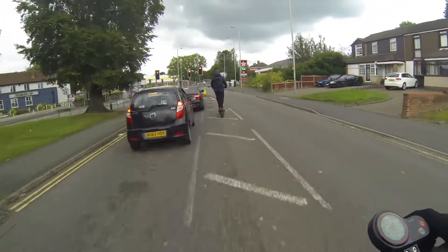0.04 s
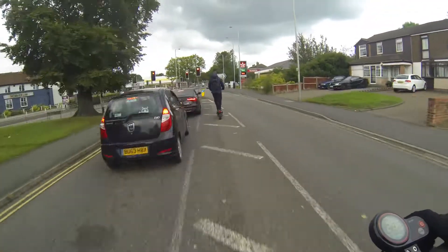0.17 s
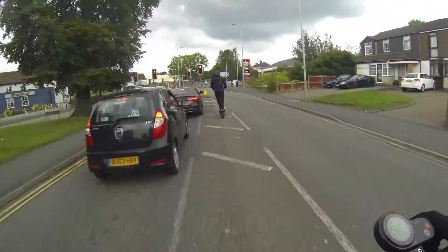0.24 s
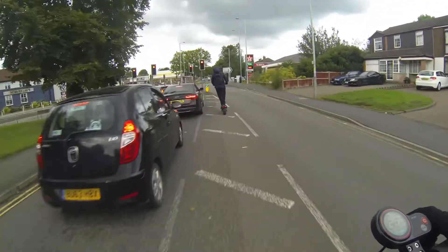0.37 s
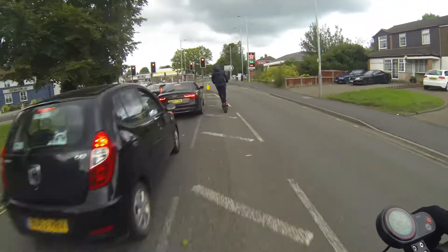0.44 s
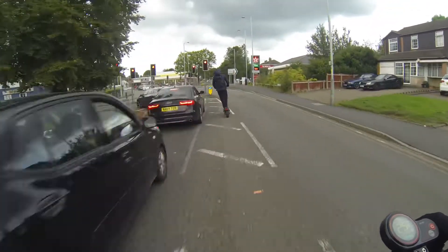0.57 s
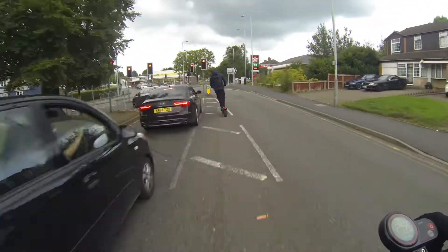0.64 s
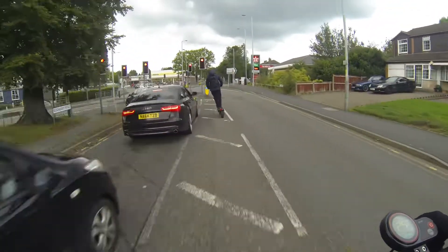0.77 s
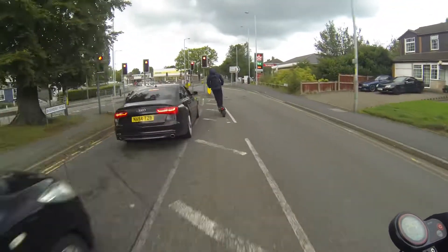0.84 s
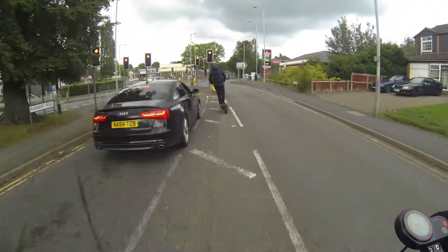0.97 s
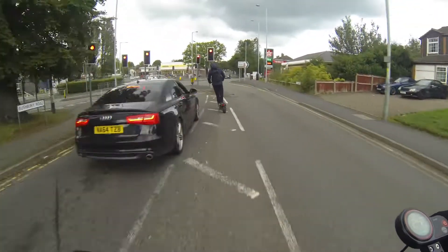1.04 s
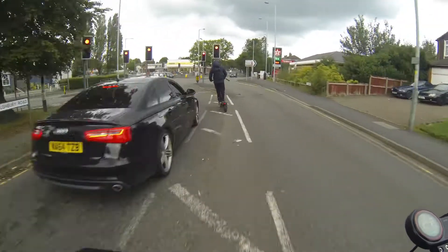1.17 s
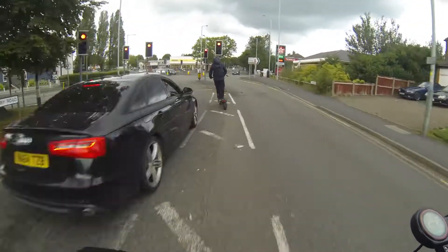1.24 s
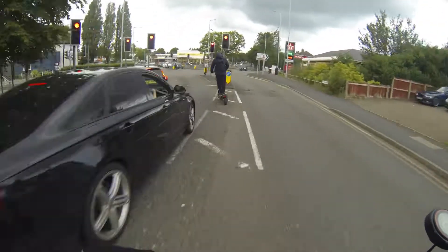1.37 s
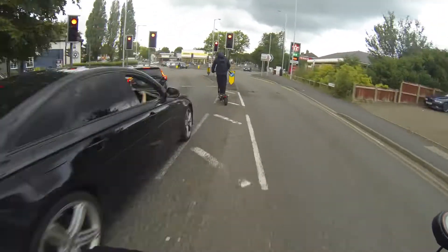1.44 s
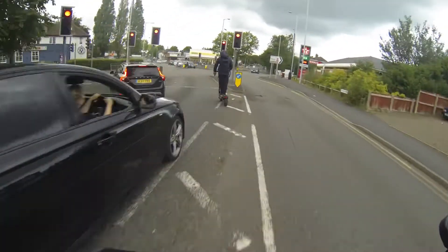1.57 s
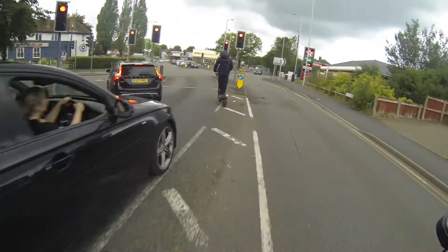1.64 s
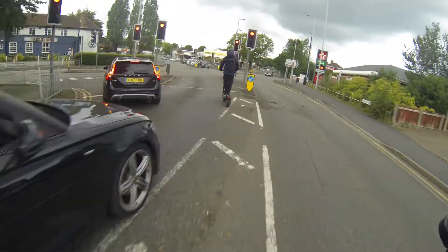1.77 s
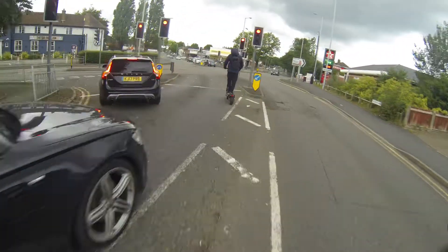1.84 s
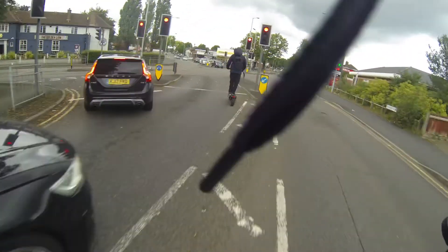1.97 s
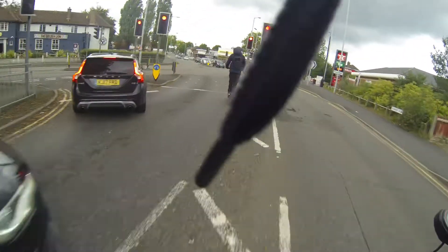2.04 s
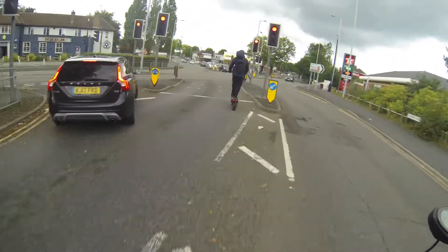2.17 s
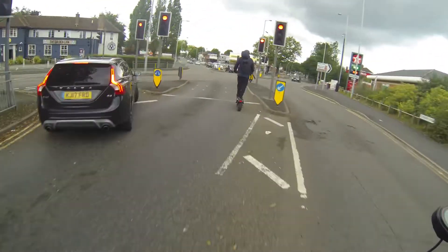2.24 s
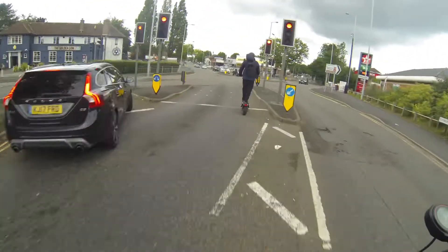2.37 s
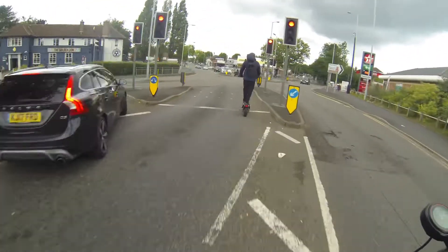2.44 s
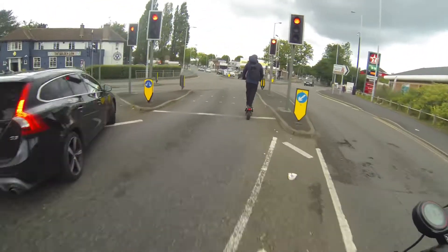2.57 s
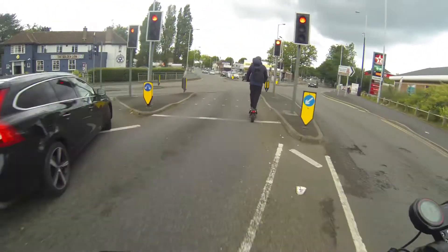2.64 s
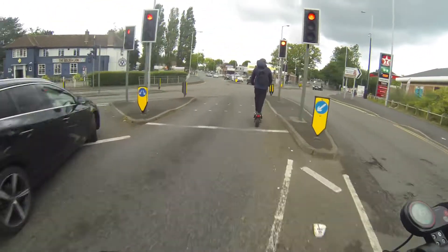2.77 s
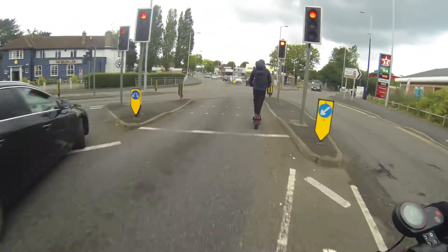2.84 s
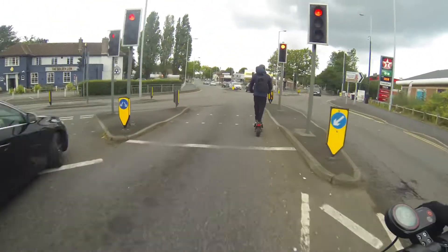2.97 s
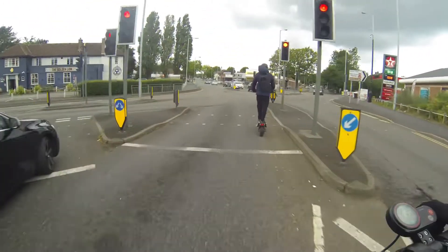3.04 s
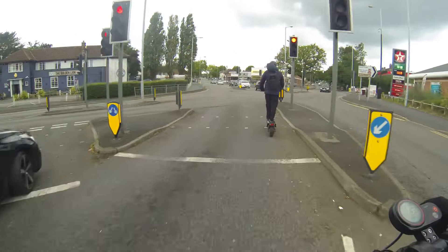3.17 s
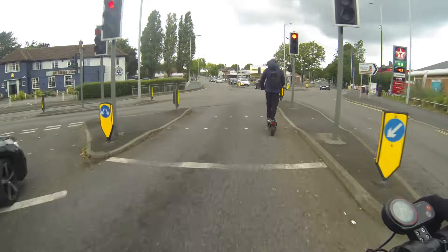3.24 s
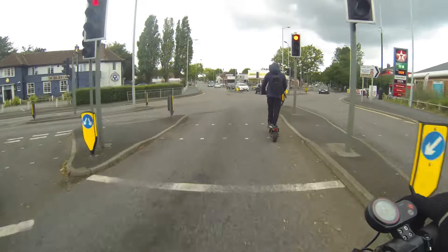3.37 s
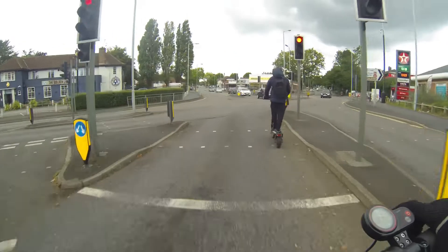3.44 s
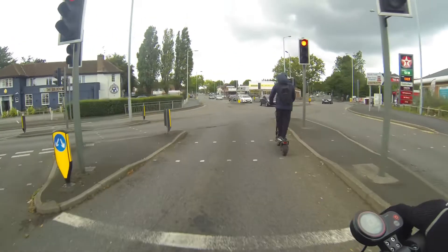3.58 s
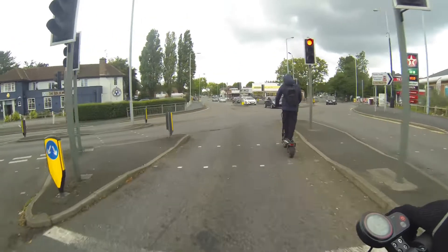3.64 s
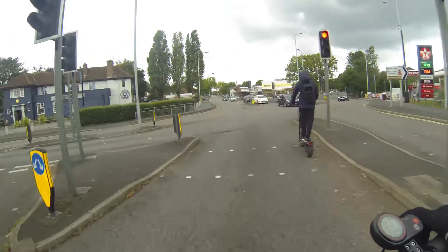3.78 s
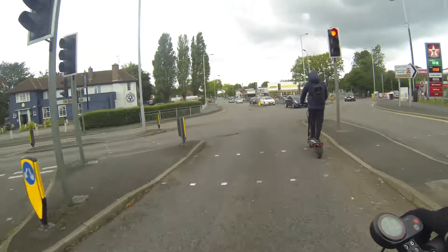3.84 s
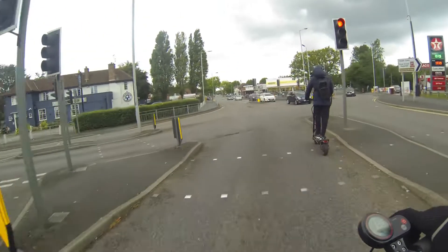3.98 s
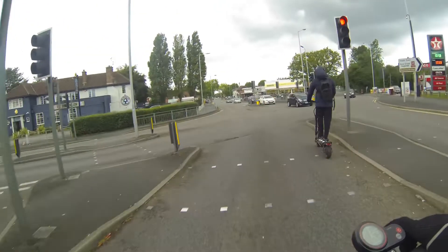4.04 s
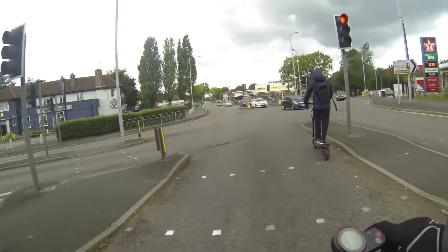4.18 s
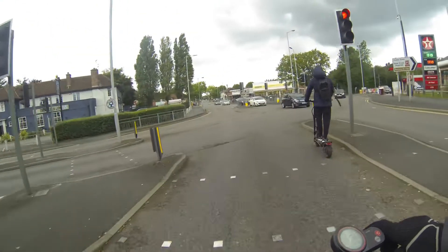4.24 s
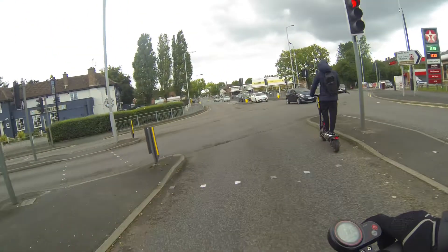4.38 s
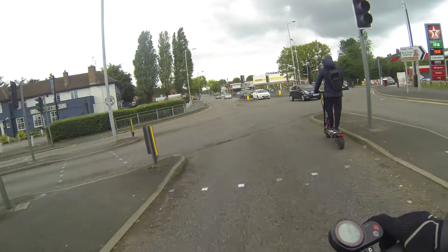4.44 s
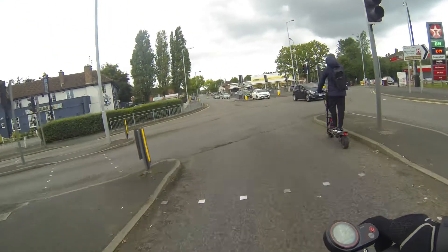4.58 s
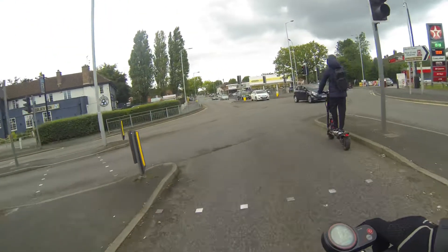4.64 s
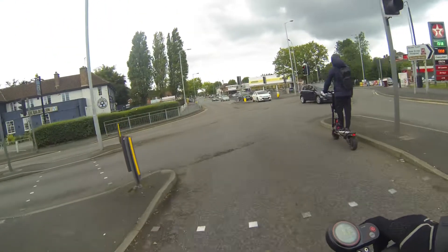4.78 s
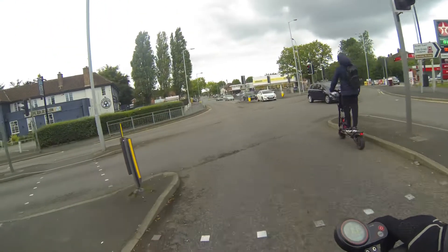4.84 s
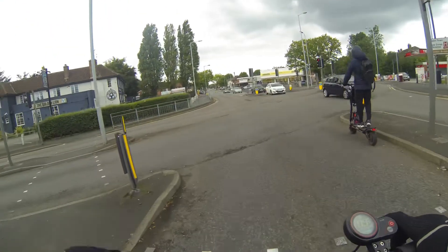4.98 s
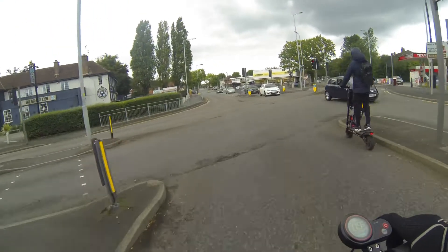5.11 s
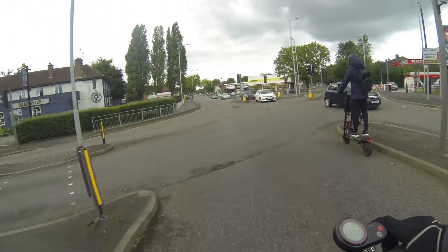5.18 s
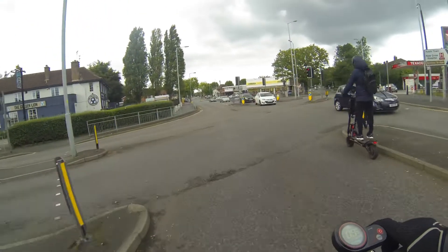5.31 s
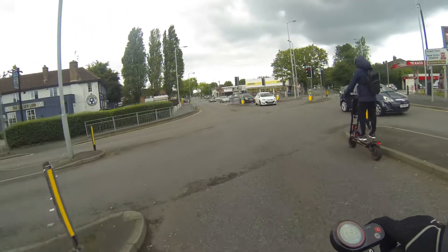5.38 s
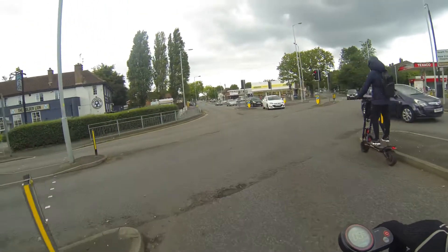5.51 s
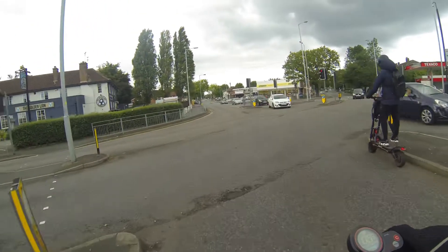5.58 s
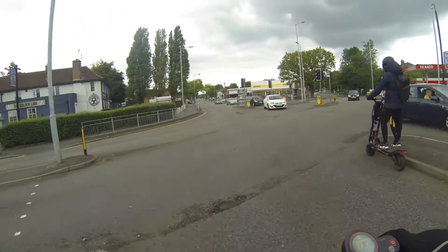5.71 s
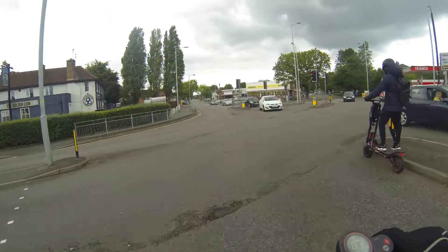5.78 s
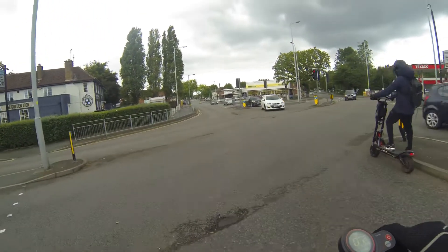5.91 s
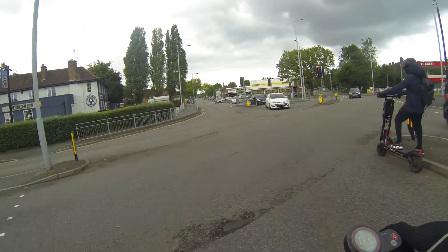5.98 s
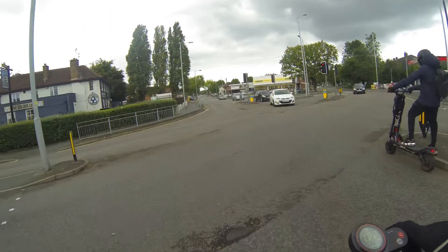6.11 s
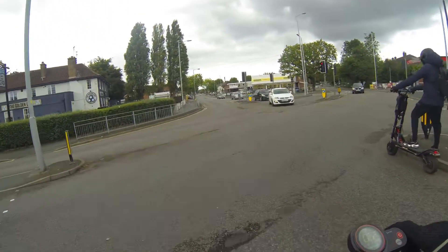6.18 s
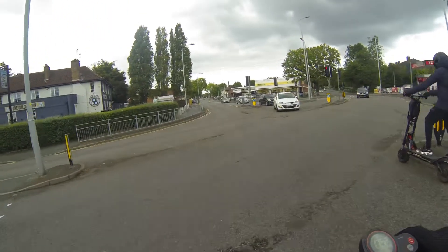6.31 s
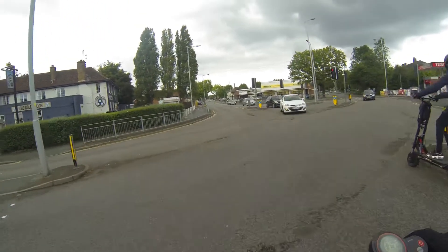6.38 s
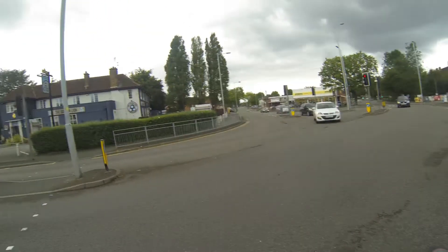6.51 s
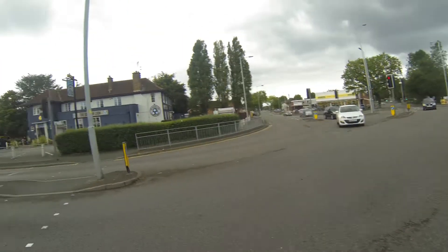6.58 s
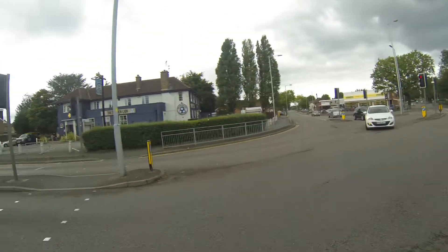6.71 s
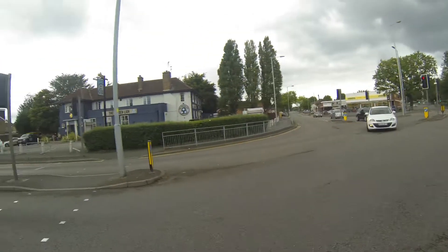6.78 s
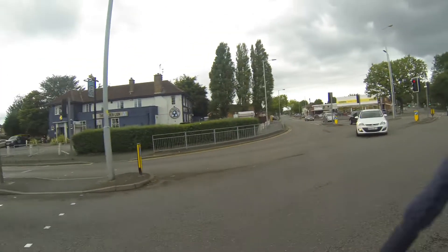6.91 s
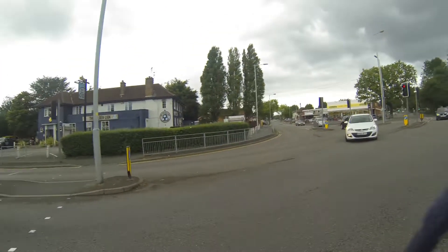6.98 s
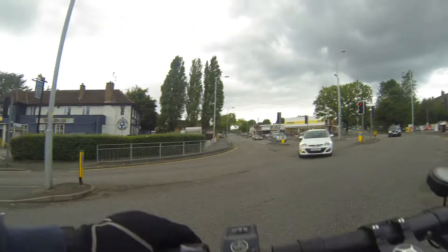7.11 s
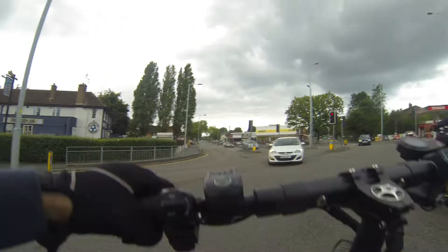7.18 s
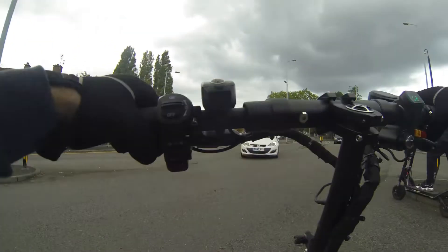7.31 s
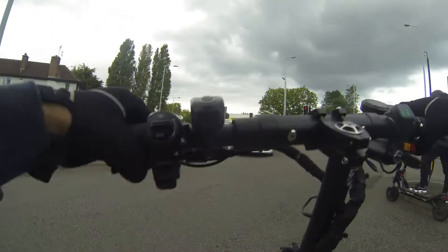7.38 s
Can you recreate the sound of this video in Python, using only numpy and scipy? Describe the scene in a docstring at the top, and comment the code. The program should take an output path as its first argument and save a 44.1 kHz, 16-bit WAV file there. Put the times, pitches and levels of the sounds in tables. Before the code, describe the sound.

Rough tyre hum and wind rush fade while a scooter slows, distant traffic opens up, then cloth rubs, thuds and plastic knocks jolt the microphone.

```python
"""Tyres hum and wind buffets a small cased camera worn by the rider of an electric scooter.
The hum, a band of noise, sinks as the scooter coasts up to a junction, where a far traffic roar opens up.
Stones ring as short sines, bumps thud as decaying low swings, and the mount clicks in bursts of noise.
Near the end the rider leans over: the camera lurches, and knocks ring the modes of its case.
Under it all lie street hiss, a faint whine from the electronics and a very faint treble crackle."""
import sys
import numpy as np
from scipy.fft import rfft, irfft, next_fast_len
from scipy.io import wavfile
from scipy.ndimage import uniform_filter1d, map_coordinates

SR = 44100
rng = np.random.default_rng(int(sys.argv[2]) if len(sys.argv) > 2 else 0)


def dump_mix(stems):
    """Bounce the given channels to the path in sys.argv[1] as a 16-bit WAV at rate SR."""
    frames = np.atleast_2d(stems).T  # one column per channel
    limited = np.clip(frames, -1, 1)  # hard clip at full scale
    pcm = np.round(limited * 32767).astype(np.int16)
    wavfile.write(sys.argv[1], SR, pcm)


N = 328104

# Colours set only the balance of a noise: [f/Hz, relative density level/dB]
# hiss of air and traffic
HISS_COLOUR = [(1200, -7.5), (2100, -7), (2450, -5.5), (2800, -7), (3150, -5), (3700, -8), (4300, -13.5),
               (5000, -13.5), (6800, -18.5), (8100, -14), (9000, -22.5), (13200, -24), (13700, -26),
               (15000, -27)]
# far traffic at the junction
TRAFFIC_COLOUR = [(90, -7), (220, 2), (400, -6.5), (750, -8), (860, -9), (1000, -1.5), (1250, -15),
                  (1650, -6.5), (2100, -17), (2600, -30), (5000, -60)]
# slow pressure swings of the wind on the case
SWAY_COLOUR = [(10, -5), (22, -5.5), (40, -8.5), (60, -23), (100, -22), (300, -74)]
# low wind buffeting on the case
BUFFET_COLOUR = [(30, -34), (55, 3), (90, 7.5), (130, -5), (170, -10), (230, -8.5), (320, -32),
                 (500, -24.5), (1500, -48), (2800, -41), (6000, -66)]
# wind rush above the rumble
RUSH_COLOUR = [(60, -23), (160, -0.5), (225, 1.5), (300, -2.5), (400, -5.5), (620, -8), (750, -8),
               (860, -13.5), (1000, -9), (1600, -19.5), (2100, -18), (2500, -26), (5000, -68)]
# ticks of the plastic mount
MOUNT_COLOUR = [(1500, 5.5), (3300, 5.5), (4200, -0.5), (5200, 4.5), (5500, 1), (5850, -2.5), (6250, 0),
                (6650, -1), (7100, -19), (8000, -0.5), (9200, -11.5), (10700, -8.5), (14500, -22)]
# jacket cloth on the case
CLOTH_COLOUR = [(60, -2.5), (120, 5), (240, 1), (400, -17.5), (900, -16.5), (1500, -18), (2200, -19.5),
                (3000, -32), (6000, -52), (12000, -69)]
# tyre hum
HUM_COLOUR = [(600, -52), (860, -17.5), (985, -4.5), (1060, -8), (1200, -0.5), (1310, -0.5), (1440, 2.5),
              (1560, -5), (1700, -8.5), (1850, -27), (2150, -24), (2450, -32), (4000, -64)]
# dry scuff of a knock
SCUFF_COLOUR = [(100, 18.5), (800, -8.5), (1700, -4.0), (2600, -18), (5000, -33), (12000, -72)]
# top-treble crackle
CRACKLE_COLOUR = [(7000, -25), (10000, 3), (13000, 3), (13800, -6)]

# Air resonances of the case: [f/Hz, width/Hz, relative level/dB]
CASE_AIR = [(2610, 66, 3.5), (3060, 170, 0.5), (3380, 130, 4)]
# Passing cars: [t/s, hiss level/dB, swell half-width/s, level/dB of the ringing air in the case]
PASSING_CARS = [(0.7, -69, 0.35, -72), (1.802, -68.5, 0.62, -67.5), (5.68, -70, 0.32, -77)]
# Electronics bursts in each cycle: [start t/s, end t/s, f/Hz before drift, level/dB of the fundamental]
WHINE_BURSTS = [(.0145, .031, 7478, -67.5), (.034, .042, 7478, -66.5), (.042, .0505, 7430, -66.5)]
# Gusts that hit the case: [t/s, buffet level/dB, swell half-width/s]
WIND_GUSTS = [(0.137, -40, 0.1), (0.747, -44, 0.29), (1.785, -48, 0.2), (2.104, -46.5, 0.16),
              (3.252, -56, 0.26), (4.995, -49.5, 0.18), (6.454, -41.5, 0.089), (7.28, -41.5, 0.21)]
# Clear ticks of the mount: [t/s, level/dB before the trim in ticks()]
MOUNT_TICKS = [(0.845, -50), (1.869, -49), (2.112, -51), (2.212, -48), (2.793, -47), (3.894, -51),
               (3.904, -49), (4.126, -54), (4.2546, -55), (4.674, -54.5), (6.987, -43.5), (7.104, -39.5),
               (7.15, -44), (7.269, -50.5), (7.3093, -55)]
# Clothing rubs on the case: [t/s, level/dB, stroke half-width/s]
CLOTHING_RUBS = [(6.392, -46, 0.042), (7.054, -49.5, 0.087), (7.171, -35.5, 0.03), (7.393, -42, 0.098)]
# Thuds through the rider's body: [t/s, swing level/dB before onset and strap, swing f/Hz, t60/s]
BODY_THUDS = [(2.2261, -17, 98, 0.052), (3.0025, -22.5, 92, 0.071), (4.243, -35, 84, 0.093),
              (5.037, -31, 94, 0.067), (7.209, -19, 64, 0.17), (7.268, -17.5, 119, 0.062),
              (7.348, -16.5, 79.5, 0.058)]
# Modes of the knocked case: [f/Hz, relative level/dB before scatter and focus, t60/s]
CASE_MODES = [(221, 2.5, 0.071), (440, -9, 0.051), (606, -4, 0.045), (764, -1.5, 0.028), (1230, 4, 0.0043),
              (1465, 2.5, 0.037), (1900, -9.5, 0.0068), (3060, -23.5, 0.025), (4860, -20, 0.017)]
# Blows on the case: [t/s, ring level/dB, favoured f/Hz, scuff level/dB], levels before the padding
CASE_KNOCKS = [(4.942, -35.5, 230, -54), (5.0304, -25, 700, -43.5), (5.0343, -29, 646, -51),
               (7.0758, -33, 1900, -30.5), (7.2820, -17, 220, -19.5), (7.2857, -25.5, 1500, -38),
               (7.294, -29, 220, -45), (7.3404, -17.5, 415, -30), (7.3425, -18, 2380, -41),
               (7.3840, -27, 910, -34), (7.3872, -22.5, 440, -35)]
# Tyre hum sinking with speed: [t/s, level/dB before the trim in tyres()]
TYRE_LEVEL = [(0.0, -42), (0.62, -44.5), (0.92, -48.5), (1.4, -47.5), (1.75, -51), (2.35, -51.5),
              (2.7, -54), (3.15, -53), (5.1, -56.5), (6.9, -55), (7.44, -51)]
# Stones struck by the tread: [t/s, peak level/dB]
TREAD_STONES = [(0.2458, -32), (1.168, -35.5), (1.204, -36.5), (1.439, -35.5), (2.096, -49), (2.187, -36.5),
                (2.349, -43), (2.367, -38), (2.409, -39), (2.486, -41.5), (4.201, -43)]

SLOW_HUM_DB = -55.5  # the hum at a crawl; the steady wind grows with the hum above this
JUNCTION_S, JUNCTION_RISE_S, JUNCTION_DB = 4.7, 0.69, -56.5  # midpoint, rise scale, final level
LURCH_S, LURCH_LENGTH_S, LURCH_HZ, LURCH_DB = 7.222, 0.042, 19, -14.5  # time, half-width, swing, peak
FAINT_TICKS_END_S = 4.8  # the faint ticks all fall before this
CYCLE_HZ = 14.9846  # cycles of the electronics' bursts
TOP_HZ = 15200  # the camera's band limit


def amp(db):
    """Decibels to gain."""
    return 10 ** (np.asarray(db) / 20)


def unit(x):
    """Scale to rms 1."""
    return x / np.sqrt(np.mean(x ** 2) + 1e-20)


def seconds(length=N):
    """The time of each sample in s."""
    return np.arange(length) / SR


def curves(rows):
    """One value per sample for each column after the time."""
    s, *cols = np.transpose(rows)
    return [np.interp(seconds(), s, c) for c in cols]


def wobble(rate):
    """A smooth random curve, rate knots a second."""
    knots = rng.standard_normal(int(N * rate / SR) + 4)
    return map_coordinates(knots, [np.arange(N) * rate / SR])


def filtered(x, response):
    """Shape the spectrum of x by a response of frequency."""
    m = next_fast_len(N + SR // 2)
    return irfft(rfft(x, m) * response(np.fft.rfftfreq(m, 1 / SR)), m)[:N]


def noise(colour):
    """Noise of rms 1, coloured by (Hz, dB) points on a log axis."""
    f, db = np.transpose(colour)
    white = rng.standard_normal(N)
    return unit(filtered(white, lambda hz: amp(np.interp(np.log(hz + 1), np.log(f), db))))


def add(track, s, sound):
    """Mix a sound into the track from time s on."""
    part = track[round(s * SR):][:len(sound)]
    part += sound[:len(part)]


def swell(s, length):
    """A bell-shaped rise and fall around time s, peak 1."""
    return np.exp(-((seconds() - s) / length) ** 2)


def together(gains):
    """The gain of unrelated noises that sound at once: their powers add."""
    return np.sqrt(sum(g ** 2 for g in gains))


def crackle(level_db=-76, t60=0.015, spread_db=10.5):
    """The top treble crackles very faintly: 130 decaying grains of noise at random times."""
    force, t = np.zeros(N), seconds(SR // 50)
    for when, size in rng.random(size=(130, 2)):
        add(force, when * N / SR, amp(level_db + spread_db * size - 60 * t / t60))
    return force * noise(CRACKLE_COLOUR)


def whine(octave_db=-9.0, drift_hz=9, steady_hz=3000, steady_db=-77):
    """The camera's electronics sing in a short cycle of bursts over one faint steady tone."""
    t = seconds()
    in_cycle = t % (1 / CYCLE_HZ)
    size, pitch = np.zeros(N), np.full(N, float(WHINE_BURSTS[0][2]))
    for start, end, hz, db in WHINE_BURSTS:
        on = (in_cycle >= start) & (in_cycle < end)
        size[on], pitch[on] = amp(db), hz
    phase = 2 * np.pi * np.cumsum(pitch + drift_hz * wobble(40)) / SR
    tone = np.sin(phase) + amp(octave_db) * np.sin(2 * phase)
    bursts = uniform_filter1d(size, size=40) * tone  # soft burst edges
    return bursts + amp(steady_db) * np.sin(2 * np.pi * steady_hz * t)


def case_resonance(hz, width):
    """Air in the case rings at one pitch: noise through a narrow peak."""
    white = rng.standard_normal(N)
    return filtered(white, lambda f: 1 / (1 + (2 * (f - hz) / width) ** 2))


def street(hiss_db=-66.5, cavity_db=-73.0, flutter_db=0.43, ring_flutter_db=3.0):
    """Air and traffic hiss swells with each car; each air resonance of the case wavers on its own."""
    air = together([amp(hiss_db)] + [amp(db) * swell(s, length) for s, db, length, _ in PASSING_CARS])
    ringing = together([amp(cavity_db)] + [amp(db) * swell(s, length) for s, _, length, db in PASSING_CARS])
    ring = unit(sum(amp(db + ring_flutter_db * wobble(7.4)) * case_resonance(hz, width)
                    for hz, width, db in CASE_AIR))
    hiss = air * amp(flutter_db * wobble(13)) * noise(HISS_COLOUR)
    return hiss + ringing * ring


def junction():
    """The roar of far traffic opens up as the scooter reaches the junction."""
    opening = (1 + np.tanh((seconds() - JUNCTION_S) / JUNCTION_RISE_S)) / 2
    return amp(JUNCTION_DB) * opening * noise(TRAFFIC_COLOUR)


def wind(sway_db=-45.5, sway_grows=0.43, sway_wander_db=2.5, buffet_db=-58, buffet_grows=0.5,
         rush_db=-58.0, rush_grows=0.59, gust_rush_db=-15, lumps_db=0.8, rough_db=2):
    """Eddies press on the case, harder at speed and in gusts, and stir the rush above the rumble."""
    # the hum level stands for speed; each "grows" is wind dB per dB of hum
    speed_db = curves(TYRE_LEVEL)[0] - SLOW_HUM_DB
    gusts = together(amp(db) * swell(s, length) for s, db, length in WIND_GUSTS)
    eddies = unit(amp(lumps_db * wobble(22)))
    sway_gain = amp(sway_db + sway_grows * speed_db + sway_wander_db * wobble(6))
    sway = sway_gain * noise(SWAY_COLOUR)
    buffet = together([amp(buffet_db + buffet_grows * speed_db), gusts]) * noise(BUFFET_COLOUR)
    flow = together([amp(rush_db + rush_grows * speed_db), amp(gust_rush_db) * gusts])
    rush = flow * unit(amp(rough_db * wobble(70))) * noise(RUSH_COLOUR)
    return sway + eddies * buffet + np.sqrt(eddies) * rush


def ticks(level_db=-2, t60=0.044, attack=0.0005, faint_db=-66, spread_db=9):
    """The plastic mount slips in short dry ticks, with fainter ones as the ride shakes it."""
    force, t = np.zeros(N), seconds(SR // 12)
    slip = amp(-60 * t / t60) * (1 - np.exp(-t / attack))
    for s, db in MOUNT_TICKS:
        add(force, s, amp(db + level_db) * slip)
    for when, size in rng.random(size=(18, 2)):
        add(force, when * FAINT_TICKS_END_S, amp(faint_db + spread_db * size) * slip)
    return force * noise(MOUNT_COLOUR)


def rubs(catch_db=4):
    """The jacket drags over the case, catching and letting go: noise with a rough gain."""
    stroke = sum(amp(db) * swell(s, length) for s, db, length in CLOTHING_RUBS)
    return stroke * unit(amp(catch_db * wobble(110))) * noise(CLOTH_COLOUR)


def lurch():
    """The camera swings slowly to and fro as the rider leans over."""
    swing = np.cos(2 * np.pi * LURCH_HZ * (seconds() - LURCH_S))
    return amp(LURCH_DB) * swell(LURCH_S, LURCH_LENGTH_S) * swing


def thuds(attack=0.0031, strap_hz=270, strap_db=-4, strap_t60=0.021):
    """Jolts swing the camera for a few low cycles and snap its strap taut."""
    out, t = np.zeros(N), seconds(SR // 4)
    strap = amp(strap_db - 60 * t / strap_t60) * np.sin(2 * np.pi * strap_hz * t)
    onset = 1 - np.exp(-t / attack)
    for s, db, hz, t60 in BODY_THUDS:
        swing = amp(-60 * t / t60) * np.sin(2 * np.pi * hz * t)
        add(out, s, -amp(db) * (swing + strap) * onset)
    return out


def knocks(scuff_t60=0.069, focus_db=6.0, soft_hz=3600):
    """Each blow rings the damped case, most near the pitch its contact favours, and scuffs it."""
    out, t = np.zeros(N), seconds(SR // 6)
    scuff = noise(SCUFF_COLOUR)
    for s, db, favoured, scuff_db in CASE_KNOCKS:
        scatter = 1.5 * rng.standard_normal(len(CASE_MODES))  # dB, so no two blows match
        ring = np.zeros(len(t))
        for k, (hz, level, t60) in enumerate(CASE_MODES):
            octaves_off = abs(np.log2(hz / favoured))
            decay = amp(level + scatter[k] - focus_db * octaves_off - 60 * t / t60)
            ring += decay * np.sin(2 * np.pi * hz * t) * (-1) ** k
        contact = amp(scuff_db - 60 * t / scuff_t60) * np.roll(scuff, -round(s * SR))[:len(t)]
        add(out, s, amp(db) * ring / np.abs(ring).max() + contact)
    # the padded contact passes little treble
    return filtered(out, lambda f: 1 / (1 + 1j * np.sqrt(2) * f / soft_hz - (f / soft_hz) ** 2) ** 2)


def tyres(level_db=1, grain_db=1.14, flutter_db=0.5, stone_hz=1400, stone_t60=0.025, stone_attack=0.0017):
    """Tread drums on coarse asphalt: a band of hum, rough with the stones and weaker as speed drops."""
    hum_db, = curves(TYRE_LEVEL)
    road = unit(amp(grain_db * wobble(130) + flutter_db * wobble(24)))
    out = amp(hum_db + level_db) * road * noise(HUM_COLOUR)
    # a larger stone rings the same band for a few cycles
    t = seconds(SR // 25)
    envelope = amp(-60 * t / stone_t60) * (1 - np.exp(-t / stone_attack))
    for s, db in TREAD_STONES:
        pitch = stone_hz * (1 + 0.014 * rng.standard_normal())
        ring = envelope * np.sin(2 * np.pi * pitch * t)
        add(out, s, amp(db) * ring / np.abs(ring).max())
    return out


def scene():
    """Everything meets at the one microphone."""
    background = crackle() + whine() + street() + junction()
    handling = ticks() + rubs() + lurch() + thuds() + knocks()
    return (background + wind() + handling + tyres())[None]


def record(dry):
    """The camera cuts steeply above its band limit."""
    return filtered(dry[0], lambda hz: 1 / (1 + (hz / TOP_HZ) ** 400))[None]


dry = scene()
out = record(dry)
dump_mix(out)
```